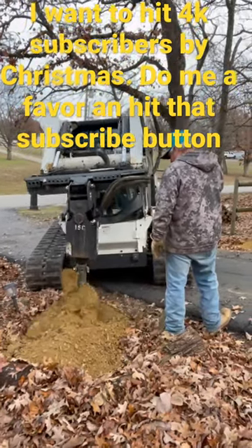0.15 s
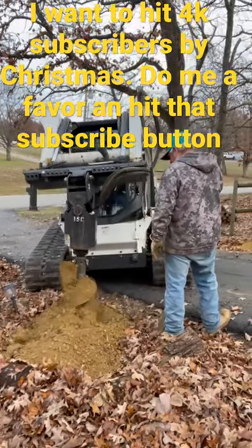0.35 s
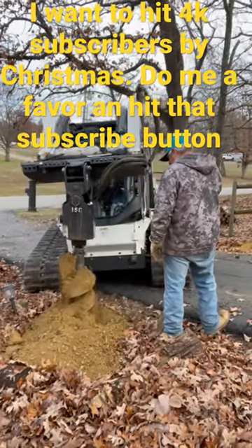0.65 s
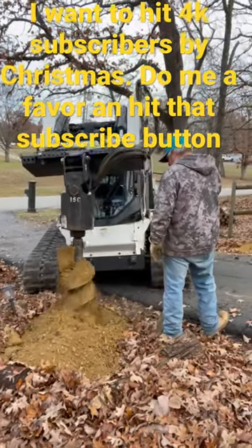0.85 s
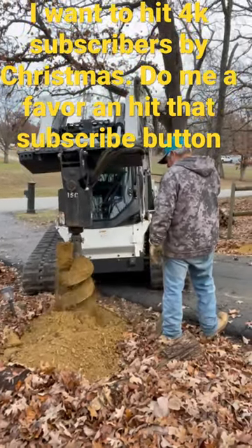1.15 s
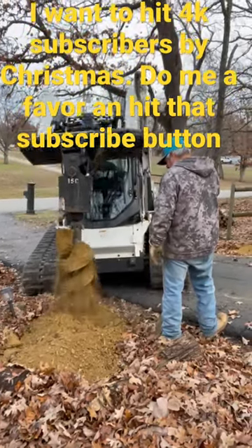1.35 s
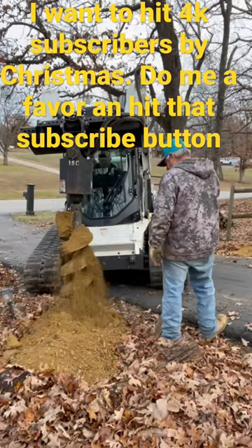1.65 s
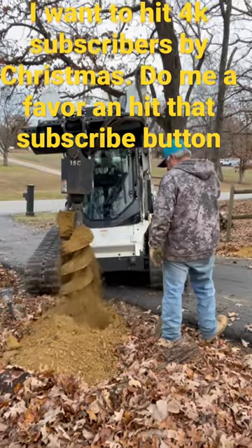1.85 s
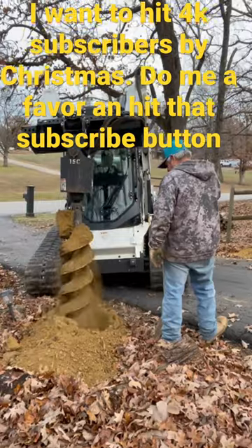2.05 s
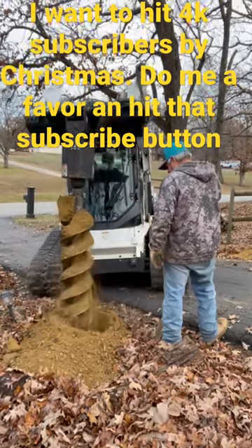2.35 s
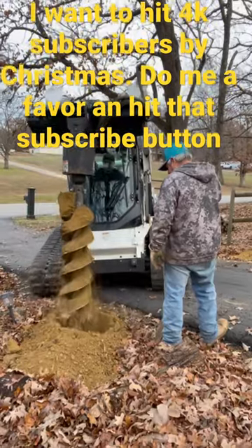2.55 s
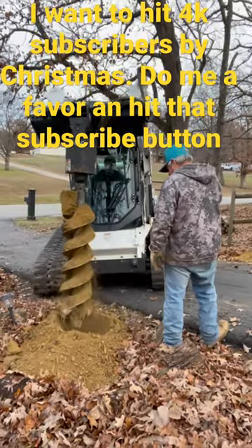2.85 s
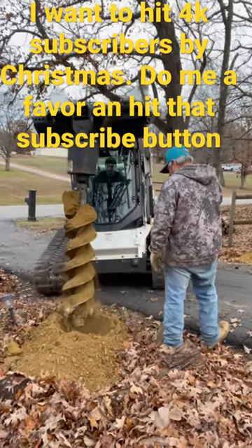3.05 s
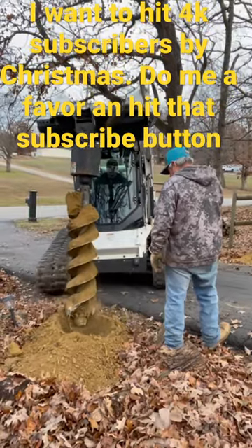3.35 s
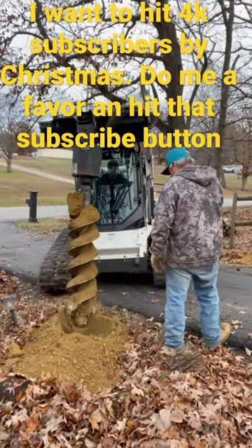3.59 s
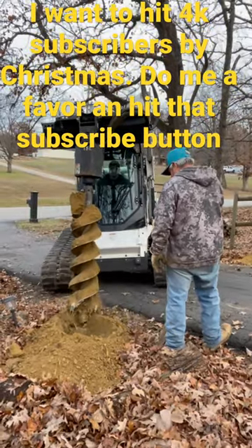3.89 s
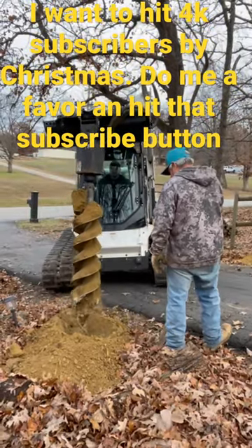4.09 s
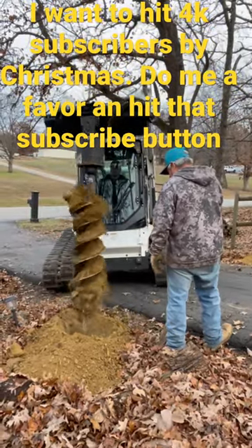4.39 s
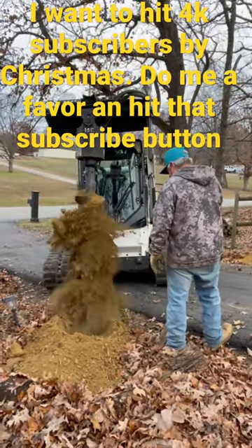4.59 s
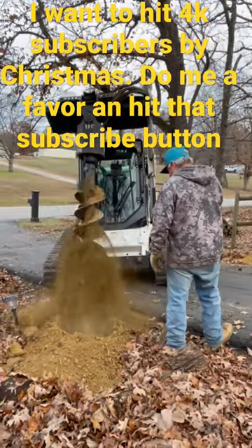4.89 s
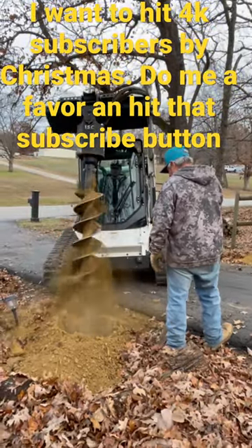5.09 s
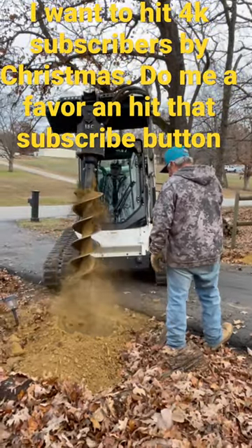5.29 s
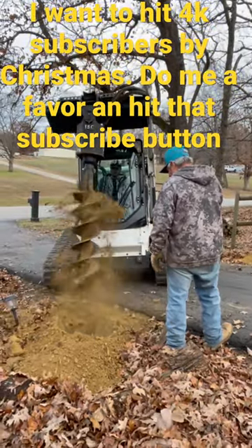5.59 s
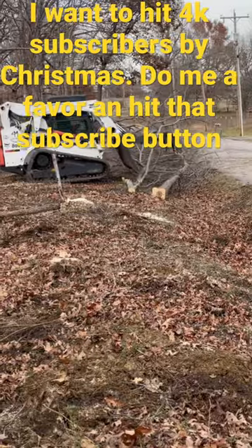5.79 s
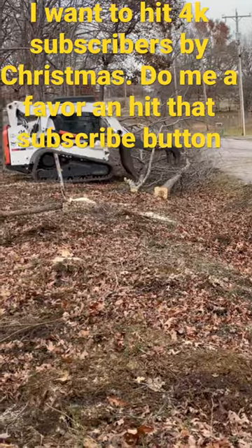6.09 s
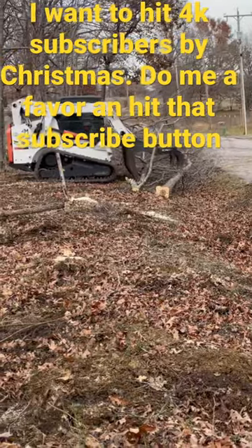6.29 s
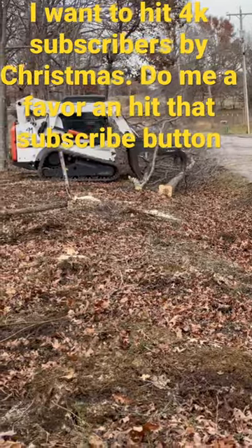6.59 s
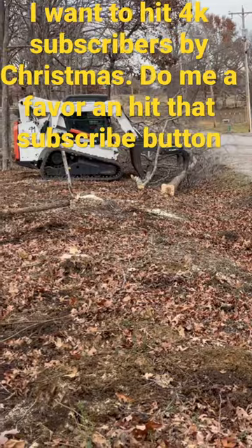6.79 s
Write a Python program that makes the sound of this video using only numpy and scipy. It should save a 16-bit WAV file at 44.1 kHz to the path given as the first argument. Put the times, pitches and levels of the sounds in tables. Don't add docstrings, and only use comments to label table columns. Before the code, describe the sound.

Close outdoor phone pickup of a tracked diesel loader: constant low drone, hydraulic pump whine and broad fan roar, with oil hissing as the arm lifts. An auger coupling gives scattered hard steel clanks, then soil sprays onto dry leaves amid the heaviest banging and low booms. It cuts suddenly to the same kind of machine farther away, lower and softer, with a crisp twig snap nearby.

```python
import sys
import numpy as np
from scipy import signal
from scipy.fft import rfft, irfft, next_fast_len
from scipy.io import wavfile
from scipy.ndimage import uniform_filter1d, minimum_filter1d, map_coordinates

SR = 44100
rng = np.random.default_rng(int(sys.argv[2]) if len(sys.argv) > 2 else 0)


def boost(x):
    u = np.asarray(x, float) / 20
    return 10 ** u


def file_out(sig):
    cols = np.atleast_2d(sig).T
    lim = np.clip(cols, -1, 1)
    pcm = np.round(lim * 32767).astype(np.int16)
    wavfile.write(sys.argv[1], SR, pcm)


N = 306054

# (time [s], level [dB])
NEAR_FIRING = [(0, -24.5), (.5, -24), (1.9, -23.5), (2.8, -25.5), (3.06, -28), (3.2, -25), (3.34, -28.5),
               (3.47, -25), (3.64, -31), (3.8, -24.5), (4.6, -23.5), (5.1, -26), (5.66, -26.5)]
FAR_FIRING = [(5.7, -29), (5.82, -34), (5.93, -32), (6.15, -36), (6.25, -28), (6.39, -29.5), (6.5, -39),
              (6.7, -38), (6.89, -34), (6.94, -35)]
# (time [s], firing rate [Hz])
NEAR_SPEED = [(0, 79.2), (.75, 79.3), (1.1, 79.1), (1.75, 79.5), (2.7, 79.35), (3, 80.1), (3.5, 80.25),
              (3.8, 79.5), (4.5, 79.3), (5.66, 79.5)]
FAR_SPEED = [(5.7, 57.05), (6.94, 57.1)]
# (multiple of firing rate [1], level [dB])
NEAR_ORDERS = [(.75, -22), (1.25, -25), (1.5, -11.5), (1.75, -13.5), (2, -7), (2.25, -16), (2.5, -23),
               (3.5, -20.5), (3.75, -59), (4, -22.5), (4.25, -25), (4.5, -22), (5, -19), (5.25, -19.5),
               (5.5, -16), (5.75, -38), (6, -17), (7, -18.5), (7.5, -24), (8, -56), (12, -25)]
FAR_ORDERS = [(1.5, -17), (1.75, -20), (2, -16), (2.25, -10), (2.5, -9), (3, -6.5), (6.5, -16), (7.5, -32),
              (13, -23), (15, -41), (20, -16)]
# (time [s], piston rate [Hz], first, second and third harmonic [dB])
NEAR_PUMP = [(0, 255, -22.5, -21, -44), (.9, 255.9, -21.5, -24.5, -43.5), (2, 254.6, -21.5, -24, -39),
             (2.6, 254.6, -21.5, -25, -43), (3.1, 255.8, -21, -26.5, -39.5),
             (3.55, 254.9, -23.5, -26.5, -40), (3.7, 254.9, -23, -21.5, -39), (4.05, 254, -25.5, -27, -33),
             (4.4, 255.5, -23.5, -23.5, -36), (4.9, 255.3, -22.5, -27, -40),
             (5.1, 255.9, -23, -23.5, -41.5), (5.3, 256.4, -23.5, -27, -37.5),
             (5.55, 255, -21.5, -21.5, -35.5), (5.66, 256, -23.5, -26, -42)]
FAR_PUMP = [(5.7, 238.4, -37.5, -60, -51), (5.9, 239, -34.5, -52, -46), (6.1, 239.1, -32.5, -49.5, -57),
            (6.3, 238.4, -32.5, -45, -51), (6.94, 241.2, -32, -41.5, -47)]
# (multiple of piston rate [1], level [dB])
NEAR_WHINE = [(4, -39), (5, -48), (6, -50.5), (7, -58), (8, -54.5), (9, -61), (2.8, -47)]
FAR_WHINE = [(1.4, -55), (2.8, -54), (3.6, -57), (4.8, -55), (8.4, -58)]
# (time [s], level [dB])
NEAR_STRAIN = [(0, -8), (1, -4), (1.6, 5.5), (2.4, 5), (3, -0.5), (3.4, -5.5), (5.66, -3)]
FAR_STRAIN = [(5.7, 0), (6.94, 0)]
# (time [s], loss [dB], half-width [s])
ECHO_LOSSES = [
    (1.78, -9, 0.08),
    (2.15, -4, 0.042),
    (2.4, -11, 0.096),
    (2.95, -10, 0.043),
    (3.58, -7, 0.018),
    (4.05, -2.5, 0.097),
    (5.01, -16, 0.03),
    (5.2, -10, 0.043),
    (5.3, -10, .015),
    (5.41, -14, .015),
]
# (frequency [Hz], level [dB per Hz])
NEAR_ROAR = [(18, -60), (34, -22), (75, -6), (164, -10), (300, -9.5), (511, -10), (960, -14.5),
             (2080, -20.5), (2330, -26.5), (2780, -20.5), (3000, -25.5), (7290, -32.5), (11400, -36.5),
             (12400, -48.5), (13300, -54)]
FAR_ROAR = [(18, -45), (35, -24), (109, -10), (239, -12.5), (300, -21), (580, -23.5), (1150, -16),
            (1650, -26.5), (2010, -25.5), (2330, -30.5), (2650, -27.5), (3800, -36.5), (6500, -41),
            (11200, -47.5), (11600, -47), (11900, -66), (12600, -76)]

# (time [s], level [dB])
LIFT_HISS = [
    (0, -41),
    (.6, -40),
    (1.3, -37.5),
    (1.9, -45),
    (2.6, -53),
    (4, -62),
    (5.66, -47),
]
# (frequency [Hz], width [Hz], level [dB])
PIPES = [(1480, 100, -6), (1860, 50, -2), (2060, 80, -2), (2750, 31, 2), (4060, 50, -11)]

# (time [s], peak [dB], hold [s])
SOIL_FLINGS = [
    (4.528, -47, 0.063),
    (4.662, -48, 0.093),
    (4.779, -31, 0.051),
    (4.839, -35.5, 0.046),
    (4.954, -43.5, 0.052),
    (5.03, -45, .06),
    (5.2, -60, 0.054),
    (5.607, -44, .06),
]
# (frequency [Hz], level [dB])
SOIL_COLOUR = [(880, -37), (1500, -3), (2480, -1.5), (3670, -7.5), (6280, -2), (9000, -10), (11500, -8),
               (13000, -33)]
# (time [s], peak [dB], frequency [Hz])
TWIGS = [
    (5.748, -40, 11440),
    (5.857, -30, 8600),
    (5.857, -31, 11300),
    (5.858, -44, 13000),
    (5.4, -36, 11400),
]

# (time [s], peak [dB], loudest mode [Hz], treble [dB], t60 [s])
CLANKS = [(0.5057, -8, 1170, -21.5, 0.085), (1.5394, -20, 923, -32, 0.14), (1.567, -22, 1280, -30, 0.11),
          (1.7055, -11, 1470, -24, 0.083), (2.146, -6, 1750, -19, 0.06), (2.165, -16.5, 1220, -28, 0.14),
          (2.37, -8.5, 1310, -19.5, 0.17), (2.3842, -12.5, 2000, -18, 0.15),
          (4.044, -11.5, 2035, -25, 0.12), (4.149, -11.5, 2080, -27, 0.088),
          (4.172, -12.5, 1000, -19.5, 0.11), (4.2717, -16.5, 919, -14.5, 0.46),
          (4.312, -12, 1600, -30, 0.17), (4.928, -6, 1790, -25, 0.11), (5.113, -8.5, 1870, -5, 0.084),
          (5.1178, -5.5, 1490, -25, 0.22), (5.152, -4, 990, -9, 0.058), (5.1794, -17, 1970, -16, 0.11),
          (5.38, -17, 996, -16, 0.1), (5.388, -5.5, 1750, -23, 0.12), (5.402, -9, 1220, -15.5, 0.35),
          (5.4494, -12, 1389, -14, 0.1), (5.5847, -16.5, 1370, -17.5, 0.082)]
# (frequency [Hz], level [dB])
CLANK_COLOUR = [(350, -29), (600, -6.5), (1180, 1.5), (1820, 3), (2580, -1), (4640, -6.5), (6980, -15.5),
                (11000, -18.5), (13000, -41)]
# (frequency [Hz], width [Hz], level over the rattle [dB])
STEEL_MODES = [(1020, 37, 16.5), (1220, 13, 17), (1470, 17, 6), (1840, 49, 0), (2050, 15, 11.5),
               (2700, 21, 5), (3150, 29, 4), (4260, 34, 7), (4740, 190, -5), (5750, 98, 9), (6160, 42, 12),
               (6850, 47, 15), (9200, 100, -10)]
# (time [s], frequency [Hz], peak [dB])
RINGS = [(.506, 1155, -10), (.506, 1800, -21.5), (1.706, 1470, -24), (1.71, 3400, -26), (2.166, 1780, -23),
         (2.152, 1037, -15), (2.165, 1220, -17), (2.375, 3380, -22), (4.173, 3270, -22), (4.174, 2590, -24),
         (4.19, 6730, -35), (3.9, 2210, -30), (4.932, 1207, -13.5), (4.928, 1020, -23), (4.9275, 1500, -20),
         (4.041, 1234, -24), (5.388, 430, -18), (5.455, 435, -16), (5.117, 552, -16), (5.115, 1878, -16),
         (5.117, 1390, -18), (5.15, 1100, -17), (5.188, 6800, -34), (5.387, 1725, -14), (5.4, 1230, -12),
         (5.43, 6850, -27.5)]
# (time [s], frequency [Hz], peak [dB])
CONTACTS = [(0.5057, 1350, -18), (0.508, 2520, -22), (0.5165, 1960, -26), (1.5686, 2030, -29),
            (1.7054, 1250, -17), (1.7093, 1970, -26), (1.712, 3960, -23), (1.7153, 1440, -19),
            (1.7153, 3400, -29), (2.147, 1820, -17), (2.1473, 5900, -25), (2.1545, 1790, -9),
            (2.3694, 1250, -17), (2.3737, 1880, -16), (2.3733, 6300, -31), (2.3833, 3360, -26),
            (2.3863, 1980, -26), (2.3908, 5790, -34), (2.3923, 1920, -28), (2.4037, 1890, -29),
            (4.0465, 2060, -26), (4.0505, 1520, -26), (4.1592, 1250, -24), (4.1722, 1870, -30),
            (4.1732, 5750, -25), (4.1747, 3350, -29), (4.1754, 2520, -27), (4.1927, 6760, -37),
            (4.3214, 1600, -20), (4.279, 2900, -27), (4.268, 1953, -28), (4.3294, 1180, -18),
            (4.9285, 1660, -16), (4.932, 1960, -17), (4.928, 3520, -21), (4.9285, 5730, -29),
            (4.9365, 2780, -21), (4.9365, 5710, -28), (4.94, 1640, -21), (4.9482, 1300, -19),
            (5.1175, 4500, -13), (5.1177, 1466, -5.5), (5.1211, 5600, -28), (5.1265, 4740, -16),
            (5.1525, 5630, -22), (5.1545, 4400, -21), (5.156, 7080, -30), (5.1575, 1380, -10),
            (5.1603, 4650, -8), (5.1615, 6240, -28), (5.1655, 5530, -27), (5.167, 1390, -19),
            (5.3938, 1770, -15), (5.3964, 4740, -15), (5.4009, 2970, -25), (5.4039, 1400, -13),
            (5.4069, 9040, -29), (5.4106, 5400, -24), (5.4149, 9000, -25), (5.4374, 1150, -16),
            (5.4503, 6400, -28), (5.4563, 6180, -27)]
# (time [s], frequency [Hz], peak [dB])
FURTHER_CONTACTS = [(0.507, 4200, -33), (0.507, 5060, -31), (0.51, 4600, -29), (0.5135, 4200, -30),
                    (2.1493, 6630, -28), (2.1533, 6610, -29), (2.1573, 2880, -28), (2.1573, 3680, -30),
                    (2.1636, 1170, -21), (2.3713, 760, -19), (2.3833, 2930, -27), (2.3923, 1310, -24),
                    (2.4057, 3380, -27), (2.4077, 825, -20), (4.1493, 1440, -28), (4.1642, 1160, -27),
                    (4.2056, 2200, -28), (4.3059, 1340, -25), (4.3165, 1220, -19), (4.939, 5100, -33),
                    (5.1126, 9200, -34), (5.1156, 6720, -34), (5.1166, 5660, -28), (5.1245, 1740, -13),
                    (5.1275, 8400, -38), (5.132, 4070, -27), (5.134, 5810, -29), (5.1455, 2670, -29),
                    (5.1485, 1550, -19), (5.155, 930, -15), (5.1555, 3530, -30), (5.166, 8100, -35),
                    (5.1724, 3400, -30), (5.1744, 1870, -20), (5.3825, 6500, -31), (5.386, 5580, -31),
                    (5.3979, 945, -22), (5.4121, 3550, -26), (5.4154, 4030, -31), (5.4199, 4050, -30),
                    (5.4199, 5640, -32), (5.4209, 2780, -29), (5.4219, 9020, -32), (5.4254, 2000, -27),
                    (5.4284, 5790, -32), (5.4323, 3530, -25), (5.4523, 2430, -27), (5.4553, 1510, -21)]
# (time [s], peak [dB], frequency [Hz], t60 [s])
BOOMS = [(1.21, -21.5, 604, .29), (1.535, -13.5, 291.5, 0.43), (1.716, -13.5, 289, 0.26),
         (2.382, -14, 291, 0.34), (4.048, -18, 287, 0.4), (4.217, -19, 280, 0.35), (4.288, -23, 284.5, 1),
         (4.93, -25, 288, 0.45), (5.119, -13.5, 295.5, 0.34), (5.159, -22.5, 289, 0.43),
         (5.201, -22, 289.5, .3), (5.25, -20.5, 289.2, 0.31), (5.41, -3, 290.4, 0.15),
         (5.462, -12, 285, 0.2), (5.535, -22, 286.9, .4)]
# (time [s], peak [dB], frequency [Hz], length [s])
SHOVES = [
    (2.381, -12.5, 219, 0.02),
    (4.182, -6, 256, 0.024),
    (4.282, -6.5, 245, 0.015),
    (4.931, -17, 250.2, 0.017),
    (5.123, -5, 250, 0.026),
    (5.149, -10, 270, 0.018),
    (5.165, -18, 254, 0.013),
    (5.393, -12, 242, 0.014),
    (5.408, -9, 255, 0.017),
    (5.538, -18, 252, 0.02),
]
# (time [s], level [dB], hold [s])
SHUDDERS = [
    (5.115, -21, 0.096),
    (5.39, -21.5, 0.073),
]
# (time [s], depth [dB], time until deepest [s])
DUCKS = [
    (5.19, -5, 0.077),
    (5.41, -2, 0.062),
]

# (frequency [Hz], likeness 0-1 [1])
NEAR_ALIKE = [(300, .99), (900, .8), (1300, .1), (2050, .6), (2350, .15), (2750, .65), (3800, .2),
              (4100, .5), (4800, .22), (6100, .56), (8500, .27), (9300, .5), (9750, 1), (10400, 1),
              (11000, .8), (11500, .8), (11800, 1)]
FAR_ALIKE = [(300, .99), (1200, .75), (2300, .5), (2900, .75), (4000, .25), (5200, .55), (5900, .93),
             (7300, .45), (8400, 1), (9200, .7), (10200, 1), (11300, .7), (11800, 1)]
STEEL_ALIKE = [(600, 1), (2000, 0.72), (8500, 0.15), (9750, 1), (10400, 0.9), (11200, 0), (11800, 0.9)]
SOIL_ALIKE = [(1300, .2), (2050, 0.7), (3800, 0.19), (6100, .56), (8500, 0.2), (10100, 0.94), (11500, .7)]
# (frequency [Hz], lead of the left [rad])
NEAR_LEAD = [(0, 0), (500, .9), (900, 1.3), (1020, 2.45), (1200, 1.2), (1550, 1.3), (1750, 3.4),
             (2000, 6.1), (3300, 9), (3850, 9.2), (4000, 6.6), (5500, 9.4), (5800, 12), (6300, 12.6),
             (8700, 12.6), (9750, 9.6), (10350, 9.35), (11800, 6.3)]
FAR_LEAD = [(0, 0), (500, .9), (1380, 1), (1600, 3.1), (1950, 6.3), (2300, 7), (3800, 8.9), (4500, 11.9),
            (5800, 12.6), (7600, 13.8), (8500, 12.6), (9000, 12.2), (9900, 9.55), (10350, 9.35),
            (11800, 6.3)]
STEEL_LEAD = [(0, 0), (500, .9), (1100, 1.6), (1500, 1.7), (1800, .3), (2200, 1.6), (2800, 2.4),
              (3400, 1.8), (4000, 1.5), (5000, 3.2), (6000, 6.3), (8700, 6.6), (9750, 3.3), (10350, 3.07),
              (11800, 0)]
LIFT_LEAD = [(0, 0), (1500, 0.48), (2100, 0.25), (2760, 1.3), (4050, .4)]
# (frequency [Hz], left minus right [dB])
NEAR_TILT = [(60, -4), (300, -2), (700, 0.5), (1350, 5.5), (2250, -1.5), (3500, 0), (7000, 3.5), (8800, -3),
             (9800, 1.5)]
FAR_TILT = [(60, -1.5), (500, 0), (1050, 6.5), (1900, -1.5), (4500, 2.5), (6000, -1), (7200, 1.5),
            (9500, 0.5)]
# (frequency [Hz], level [dB])
GROUND = [(960, 0), (1100, -8), (1300, -2), (9200, -0.5), (10000, 3.5), (10800, 1.5), (11500, 0)]

T = np.arange(N) / SR


def unit(x):
    return x / np.sqrt(np.mean(x ** 2) + 1e-20)


def along(points, hz):
    f, v = np.transpose(points)
    return np.interp(np.log(hz + 1), np.log(f + 1), v)


def curves(rows):
    s, *columns = np.transpose(rows)
    return [np.interp(T, s, column) for column in columns]


def wobble(rate):
    at = np.arange(0, N + 64, 64)
    knots = rng.standard_normal(int(N * rate / SR) + 4)
    return np.interp(np.arange(N), at, map_coordinates(knots, [at * rate / SR]))


def filtered(x, response):
    n = x.shape[-1]
    m = next_fast_len(n + 8192)
    return irfft(rfft(x, m) * response(np.fft.rfftfreq(m, 1 / SR)), m)[..., :n]


def spread(pair, colour, alike):
    def mid_side(hz):
        turn = np.arccos(np.clip(along(alike, hz), -1, 1)) / 2
        return colour(hz) * np.array([np.cos(turn), np.sin(turn)])

    mid, side = filtered(pair, mid_side)
    return unit(np.array([mid + side, mid - side]))


def add_at(out, s, sound):
    start = round(s * SR)
    out[..., start:start + sound.shape[-1]] += sound


def partials(turns, table, drift, flutter_db, count):
    def wave(multiple):
        cycles = round(multiple * count) / count * turns + rng.random()
        return np.sqrt(2) * np.sin(2 * np.pi * (cycles + drift * wobble(5.3)))

    return sum(boost(db + flutter_db * wobble(9)) * wave(multiple) for multiple, db in table)


def twigs():
    out, t = np.zeros(N), np.arange(400) / SR
    for s, db, hz in TWIGS:
        add_at(out, s, boost(db - 60 * t / 0.008) * np.sin(2 * np.pi * hz * t))
    return out


def soil():
    level = boost(-48.5) * np.clip((T - 4.42) / 0.16, 0, 1)
    for s, db, hold in SOIL_FLINGS:
        rise = np.clip((T - s) / 0.028, 0, 1)
        level = level + rise * boost(db - 124 * np.maximum(T - s - hold, 0))
    grains = rng.standard_normal((2, N)) * boost(2.1 * wobble(300) + 3.1 * wobble(28))
    return level * boost(6.0) * spread(grains, lambda hz: boost(along(SOIL_COLOUR, hz)), SOIL_ALIKE)


def lift_hiss():
    level_db, = curves(LIFT_HISS)

    def pipes(hz):
        return sum(boost(db) / (1 + ((hz - centre) / width) ** 2) for centre, width, db in PIPES)

    return boost(level_db + 1.5 * wobble(11)) * unit(filtered(rng.standard_normal(N), pipes))


def shudder():
    level = sum((T > s) * boost(db - 230 * np.maximum(T - s - hold, 0)) for s, db, hold in SHUDDERS)
    noise = rng.standard_normal((2, N))
    return level * spread(noise, lambda hz: boost(along(NEAR_ROAR, hz)), NEAR_ALIKE)


def thuds():
    out, t = np.zeros(N + SR), np.arange(SR // 2) / SR
    for s, db, hz, t60 in BOOMS:
        swell = boost(db - 60 * t / t60) * (1 - np.exp(-t / 0.001))
        add_at(out, s, swell * np.sin(2 * np.pi * hz * t))
    for s, db, hz, length in SHOVES:
        push = np.sin(np.pi * np.clip(t / length, 0, 1)) ** 0.65
        add_at(out, s, boost(db) * push * np.sin(2 * np.pi * hz * t))
    return out[:N]


def contacts():
    out, t = np.zeros(N + SR), np.arange(SR // 20) / SR
    for s, hz, db in CONTACTS + FURTHER_CONTACTS:
        swell = (1 - np.exp(-t / 0.00068)) * boost(db + 5 - 60 * t / 0.032)
        add_at(out, s, swell * np.sin(2 * np.pi * hz * t))
    return out[:N]


def rings():
    hold_s, t60_s = 0.014, 0.065
    out, t = np.zeros(N + SR), np.arange(SR // 4) / SR
    for s, hz, db in RINGS:
        rough = boost(1.5 * uniform_filter1d(rng.standard_normal(len(t)), size=150) * np.sqrt(150))
        swell = (1 - np.exp(-t / 0.0014)) * boost(db - 3.5 - 60 * np.maximum(t - hold_s, 0) / t60_s)
        add_at(out, s, swell * rough * np.sin(2 * np.pi * hz * t))
    return out[:N]


def clanks():
    rattle_s = 0.015
    out, t = np.zeros((2, N + SR)), np.arange(SR // 4) / SR

    def peak(hz, centre, width):
        return 1 / np.sqrt(1 + ((hz - centre) / width) ** 2)

    for s, db, mode_hz, treble_db, t60 in CLANKS:
        shape = (1 - np.exp(-t / 0.0006)) * boost(-60 * np.maximum(t - rattle_s, 0) / t60)
        shape = shape * (1 + 0.59 * boost(-60 * t / 0.0064))
        struck = boost(rng.normal(-10.0, 3.7, size=len(STEEL_MODES)))

        def colour(hz):
            modes = 1 + 0.53 * peak(hz, mode_hz, 37) ** 2
            for gain, (centre, width, level) in zip(struck, STEEL_MODES):
                modes = modes + gain * boost(level) * peak(hz, centre, width) ** 2
            treble = (treble_db + 20) * np.clip(np.log2((hz + 1) / 2500), 0, 1)
            return boost(along(CLANK_COLOUR, hz) + treble) * modes

        uneven = np.repeat(rng.standard_normal(len(t) // 60 + 1), 60)[:len(t)]
        knocks = rng.standard_normal((2, len(t))) * boost(3.4 * uneven)
        add_at(out, s, boost(db - 10.5) * shape * spread(knocks, colour, STEEL_ALIKE))
    return out[:, :N]


def echo_loss():
    return sum(db * np.exp(-((T - s) / width) ** 2) for s, db, width in ECHO_LOSSES)


def exhaust(firings, firing_db, orders, orders_db):
    tone = boost(firing_db) * partials(firings, [(1, 0)], drift=0.01, flutter_db=-1.03, count=4)
    return tone + boost(orders_db) * partials(firings, orders, drift=0.058, flutter_db=1.5, count=4)


def hydraulics(strokes, harmonics_db, strain_db, whine):
    first_db, second_db, third_db = harmonics_db
    out = boost(first_db) * partials(strokes, [(1, 0)], drift=0.0051, flutter_db=0.94, count=10)
    second = partials(strokes, [(2, 0.0047)], drift=0.12, flutter_db=0.63, count=10)
    out = out + boost(second_db + echo_loss()) * second
    out = out + boost(third_db) * partials(strokes, [(3, 0)], drift=0.18, flutter_db=3.5, count=10)
    fourth = partials(strokes, whine[:1], drift=0.2, flutter_db=3.5, count=10)
    rest = partials(strokes, whine[1:], drift=0.12, flutter_db=2.5, count=10)
    return out + boost(-0.6 * strain_db) * fourth + boost(strain_db) * rest


def fan_roar(firings, strokes, roar, alike, throb):
    z = signal.stft(rng.standard_normal((2, N)), nperseg=512)[2]
    patches = uniform_filter1d(uniform_filter1d(rng.standard_normal(z.shape[1:]), 6, 0), 12, 1)
    air = signal.istft(z * boost(1.0 * unit(patches)), nperseg=512)[1][:, :N]
    gate = 1 + throb * np.cos(2 * np.pi * firings) + 0.025 * np.cos(2 * np.pi * strokes)
    return spread(air * gate, lambda hz: boost(along(roar, hz)), alike)


def loader(speed, firing, roar_db, pump, strain, orders, whine, roar, alike, throb, orders_db):
    firing_hz, = curves(speed)
    firing_db, = curves(firing)
    piston_hz, *harmonics_db = curves(pump)
    strain_db, = curves(strain)
    firings, strokes = np.cumsum(firing_hz) / SR, np.cumsum(piston_hz) / SR
    tones = exhaust(firings, firing_db, orders, roar_db + orders_db)
    tones = tones + hydraulics(strokes, harmonics_db, strain_db, whine)
    return tones + boost(roar_db + 7.0) * fan_roar(firings, strokes, roar, alike, throb)


def ports(x, lead, tilt):
    def response(hz):
        half = boost(along(tilt, hz) / 2) * np.exp(0.5j * np.interp(hz, *np.transpose(lead)))
        return boost(along(GROUND, hz)) * np.array([half, 1 / half])

    return filtered(x, response)


def ducking():
    loss_db = 0
    for s, db, lag in DUCKS:
        late = np.maximum(T - s, 0) / lag
        loss_db = loss_db + db * late * np.exp(1 - late)
    return boost(loss_db)


def scene():
    gain = ducking()
    near_loader = loader(NEAR_SPEED, NEAR_FIRING, -33, NEAR_PUMP, NEAR_STRAIN, NEAR_ORDERS, NEAR_WHINE,
                         NEAR_ROAR, NEAR_ALIKE, throb=0.021, orders_db=10.5)
    body = (near_loader + soil()) * gain + thuds() + shudder() + twigs()
    near = ports(body, NEAR_LEAD, NEAR_TILT)
    near = near + ports(clanks() + rings() + contacts(), STEEL_LEAD, NEAR_TILT)
    near = near + ports(lift_hiss() * gain, LIFT_LEAD, NEAR_TILT)
    far_loader = loader(FAR_SPEED, FAR_FIRING, -40, FAR_PUMP, FAR_STRAIN, FAR_ORDERS, FAR_WHINE,
                        FAR_ROAR, FAR_ALIKE, throb=0.057, orders_db=6.0)
    far = ports(far_loader + twigs(), FAR_LEAD, FAR_TILT)
    change = np.clip((T - 5.672) / 0.0004, 0, 1)
    return near * (1 - change) + far * change


def roll_off(x):
    return signal.sosfilt(signal.butter(12, 13200, fs=SR, output="sos"), x)


def record(dry):
    need = np.minimum(1, 0.99 / (np.abs(dry).max(axis=0) + 1e-9))
    gain = uniform_filter1d(minimum_filter1d(need, size=401), size=201)
    return roll_off(dry * gain)


dry = scene()
out = record(dry)
file_out(out)
```